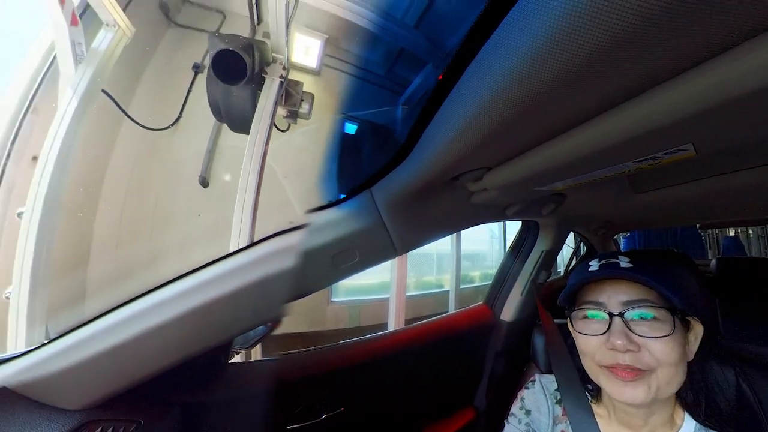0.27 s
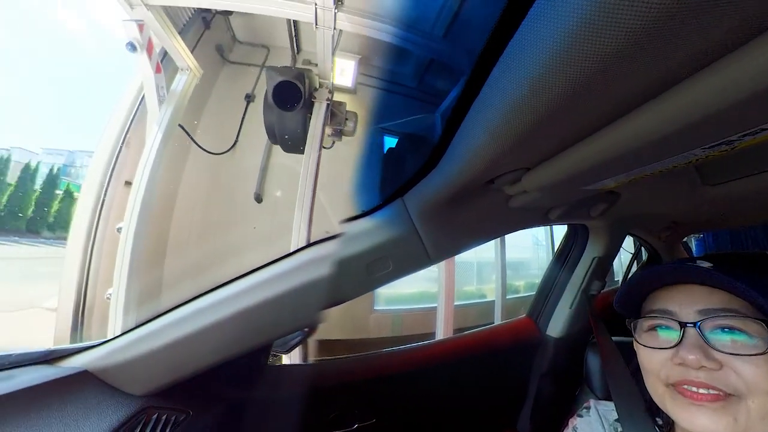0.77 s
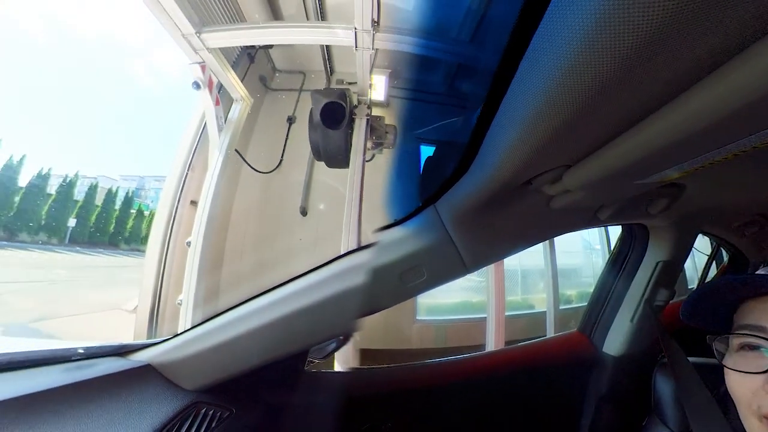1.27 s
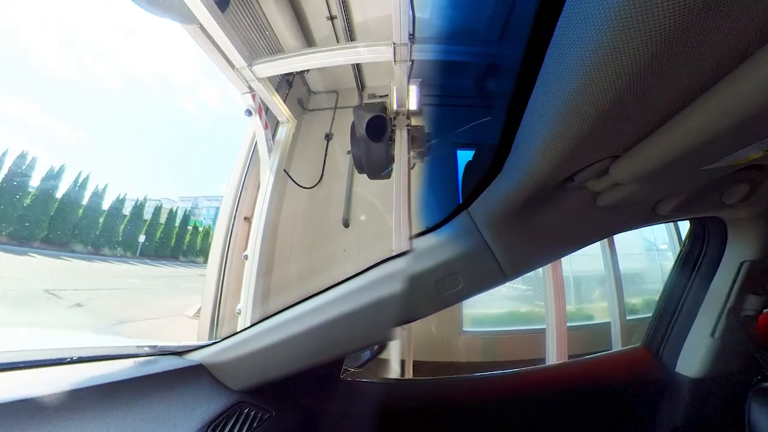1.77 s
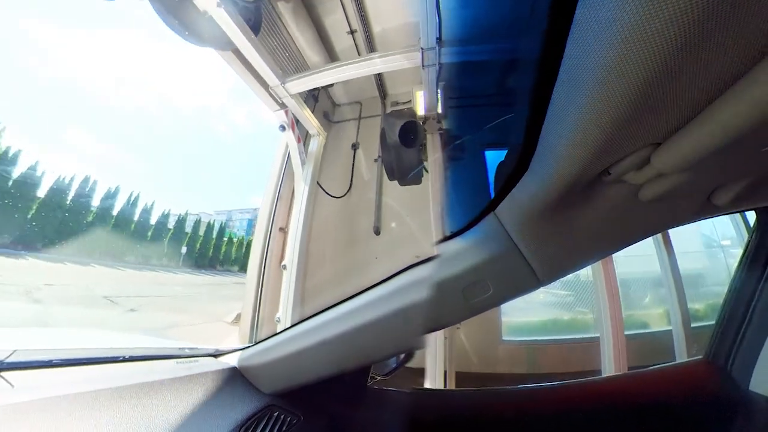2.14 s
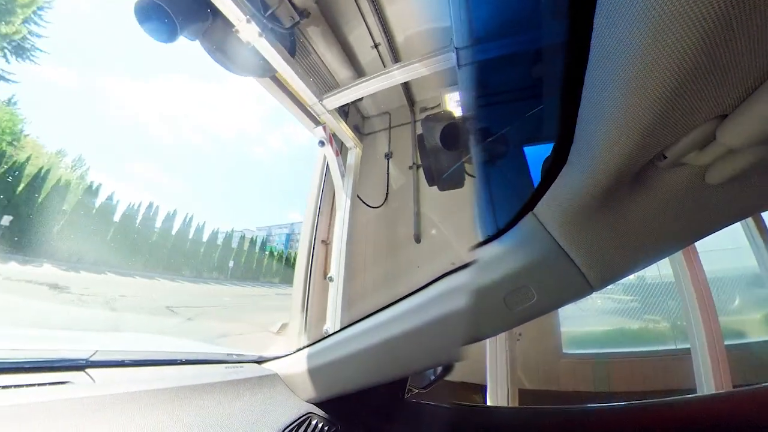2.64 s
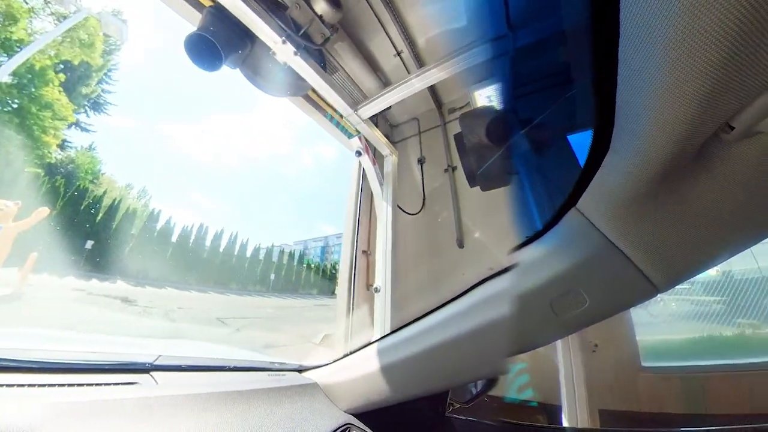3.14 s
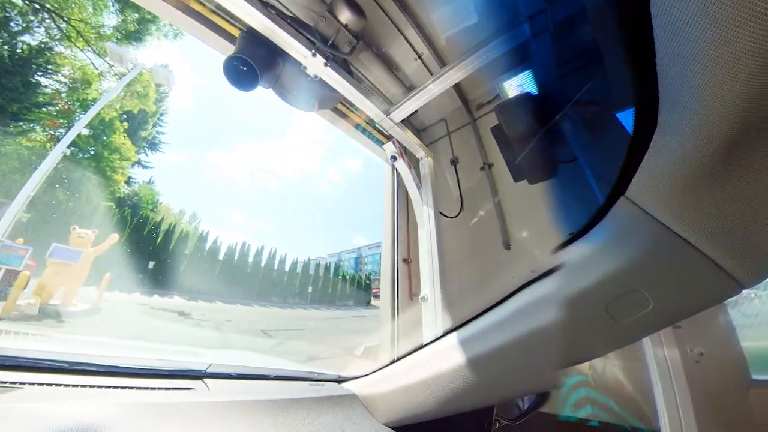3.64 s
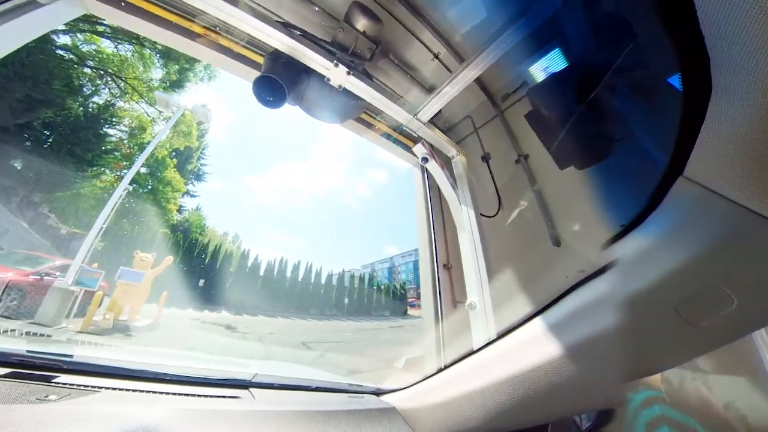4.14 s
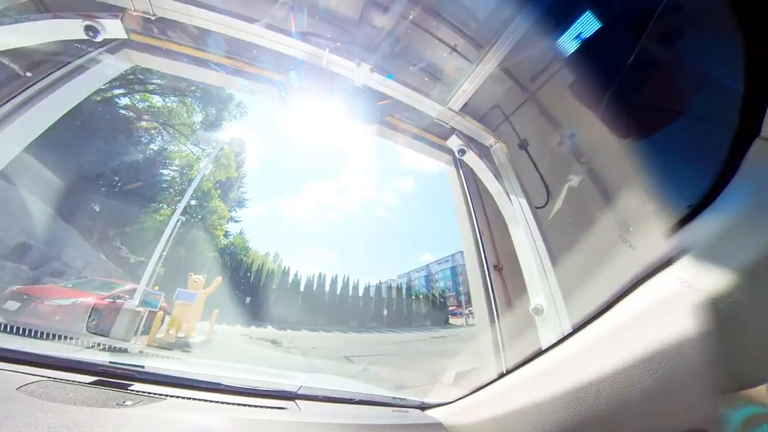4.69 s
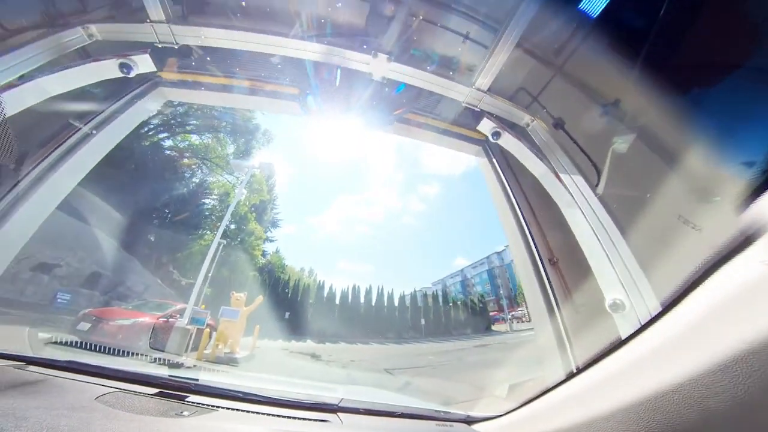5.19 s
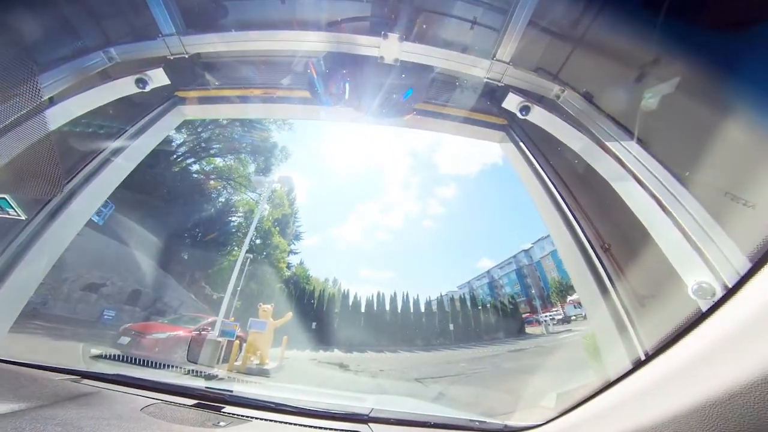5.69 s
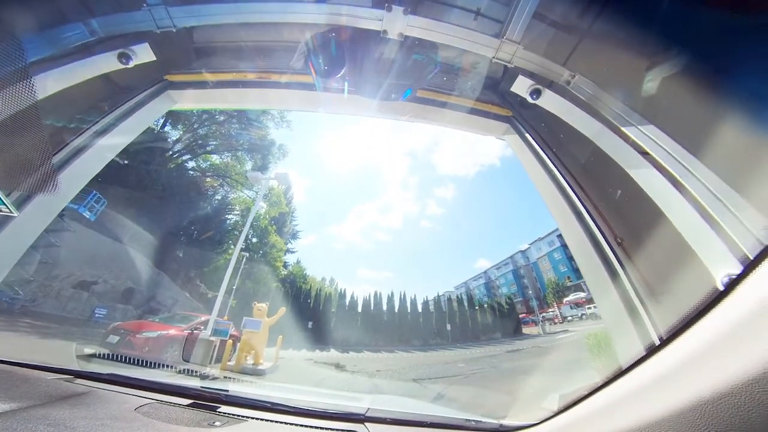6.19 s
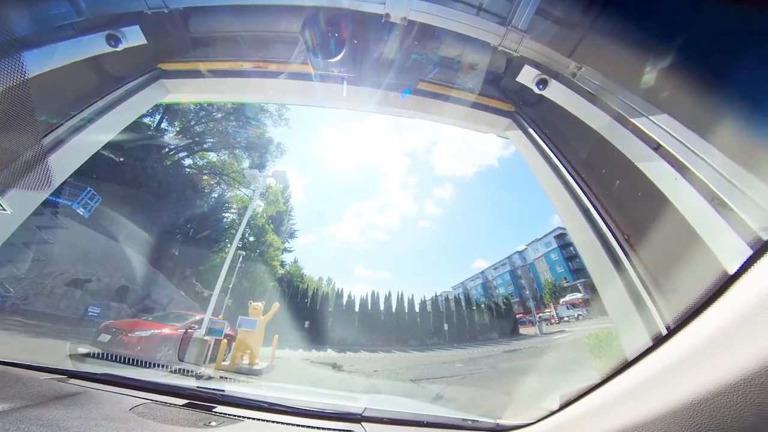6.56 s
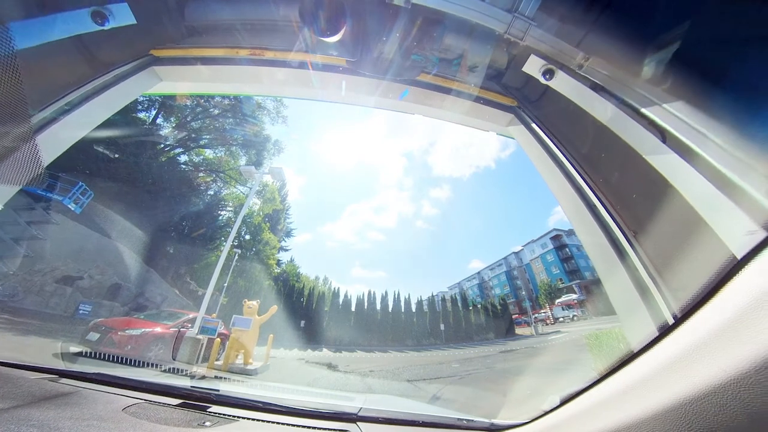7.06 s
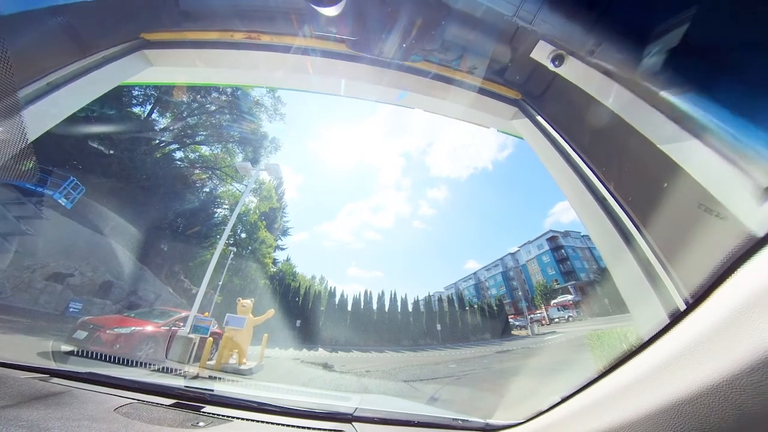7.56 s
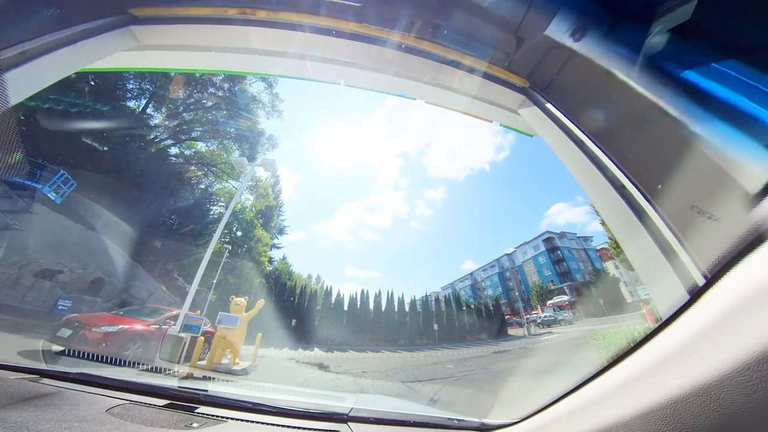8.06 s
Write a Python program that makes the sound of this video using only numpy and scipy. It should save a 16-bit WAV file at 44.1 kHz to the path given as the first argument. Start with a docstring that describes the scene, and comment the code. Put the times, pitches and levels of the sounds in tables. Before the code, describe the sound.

Car wash dryers roar and rumble, heard muffled from inside a closed car, with a faint hiss of spray on the glass.

```python
"""A muffled roar over a low drone, heard from inside a closed car rolling under a car wash's dryers.
The air jets, just outside, come through glass and body to one microphone in the cabin, and shake its
low resonances in turn as they sweep from the windscreen over the roof. The blowers drone first, then
the roof booms. Ducts and fans moan faintly in the roar; close by, air and spray fizz on the windows."""
import sys
import numpy as np
from scipy import signal
from scipy.fft import rfft, irfft, next_fast_len
from scipy.io import wavfile
from scipy.ndimage import uniform_filter1d

SR = 44100
rng = np.random.default_rng(int(sys.argv[2]) if len(sys.argv) > 2 else 0)


def unload_audio(sound):
    """Save the sound as a 16-bit wav file, at the path given as the first command line argument."""
    columns = np.transpose(np.atleast_2d(sound))
    # keep every value between -1 and 1, then stretch to whole-number steps
    steps = np.round(np.clip(columns, -1, 1) * 32767)
    wavfile.write(sys.argv[1], SR, steps.astype(np.int16))


N = 367353
TIME = np.arange(N) / SR

# Air and spray on the glass, heard from inside. Each row: frequency in Hz, relative level in dB.
SPRAY_SPECTRUM = [(1500, -12), (2800, -3), (3200, -0.2), (3650, -1.2), (4300, -4), (4900, -4), (5400, -2.5),
                  (6000, -5), (6750, -8), (7500, -15.5), (8200, -23.5), (9000, -31)]
# Nozzles passing close over the glass. Each row: nearest moment and half length in seconds,
# rise of the spray in dB, then the seal hiss's level in dB, pitch in Hz and width in Hz.
NOZZLE_PASSES = [(0.2, 0.8, 3.5, -67, 5150, 420), (4.2, 0.8, 1.1, -73, 5440, 520)]


def gain_of(db):
    """Decibels to gain."""
    return 10 ** (np.asarray(db) / 20)


def unit_rms(x):
    """Scales to an rms of one."""
    return x / np.sqrt(np.mean(x ** 2) + 1e-20)


def spectrum_db(points, hz):
    """Level at hz of a spectrum whose points are joined on a log-frequency axis."""
    point_hz, db = np.transpose(points)
    return np.interp(np.log(hz + 1), np.log(point_hz + 1), db)


def noise(colour):
    """Noise of rms one, its spectrum shaped by the gain colour(hz)."""
    size = next_fast_len(N)
    spectrum = rfft(rng.standard_normal(size)) * colour(np.fft.rfftfreq(size, 1 / SR))
    return unit_rms(irfft(spectrum, size)[:N])


def ringing(hz, width_hz, steadiness=0):
    """A resonance driven by turbulence: its size and phase wander as fast as its width allows."""
    slow_time = TIME[::8]
    offset_hz = np.fft.fftfreq(next_fast_len(len(slow_time)), slow_time[1])
    real, imag = rng.standard_normal((2, len(offset_hz)))
    swing = np.fft.ifft((real + 1j * imag) / (1 + 2 * (offset_hz / width_hz) ** 2))[:len(slow_time)]
    swing = swing / swing.real.std()
    swing = swing / (1 + abs(swing) ** 2) ** steadiness  # large swings are damped most
    size = np.interp(TIME, slow_time, abs(swing))
    wander = np.interp(TIME, slow_time, np.unwrap(np.angle(swing)))
    phase = 2 * np.pi * np.cumsum(hz * np.ones(N)) / SR
    return unit_rms(size * np.cos(phase + wander))


def passing(at_s, half_s):
    """Nearness, 0 to 1, of something the car rolls past at a steady pace."""
    return np.exp(-((TIME - at_s) / half_s) ** 2)


def crossed(at_s, lasting_s):
    """A smooth step from 0 to 1 as the jets cross from one part of the car to the next."""
    return .5 + .5 * np.tanh(2 * (TIME - at_s) / lasting_s)


def lull(at_s=2.12, drop_s=0.46, recover_s=3):
    """Shielding by the body, 0 to 1: it sets in as the first jets leave the windscreen, then ebbs."""
    return crossed(at_s, drop_s) * passing(at_s, recover_s)


def deep_gain(dip_db=4):
    """Gain of the deepest rumble, which thins while the jets are square over the roof."""
    return gain_of(-dip_db * passing(at_s=4.8, half_s=0.32))


def roar(low_db=-23.0, upper_db=-25.5, low_lull_db=1.35, upper_lull_db=1.0, leaving_db_per_s=0.0944):
    """The jets' turbulence, muffled by the body; it eases in the lull and dulls as the car leaves."""
    # The roar as it reaches the cabin. Each row: frequency in Hz, relative level in dB.
    through_body = [(20, -34), (38, -6), (70, 4), (160, 2), (270, -0.84), (325, -1.3), (400, -4), (485, -6),
                    (530, -7), (750, -12), (1020, -20), (1450, -24), (2150, -35), (2900, -41.5),
                    (4000, -57.5), (8000, -70.5)]
    # Resonances of windows and trim. Each row: centre in Hz, width in Hz, lift in dB.
    panels = [(1100, 120, 2), (1460, 70, 0), (2460, 290, 2)]

    def colour(hz):
        panels_db = sum(db / (1 + (2 * (hz - centre) / width) ** 2) for centre, width, db in panels)
        return gain_of(spectrum_db(through_body, hz) + panels_db)

    def below(edge_hz):
        return irfft(rfft(rush) / (1 + (np.fft.rfftfreq(N, 1 / SR) / edge_hz) ** 10), N)
    rush = noise(colour)
    low, deep = below(edge_hz=540), below(edge_hz=88)
    low_gain = gain_of(low_db - low_lull_db * lull())
    upper_gain = gain_of(upper_db - upper_lull_db * lull() - leaving_db_per_s * TIME)
    return low_gain * (low - deep + deep_gain() * deep) + upper_gain * (rush - low)


def cabin_rumble():
    """Low resonances around the microphone swell in turn as the jets cross the body's yielding spots."""
    # Each row: pitch, its climb as the jets reach the roof and width in Hz, mean level and swing in dB,
    # strongest moment and time from one yielding spot to the next in seconds.
    cabin_modes = [(108.94, 17, 38, -27.5, 2.5, 2.23, 7.6), (168.2, 18, 42, -29.5, 3, 4.65, 7.9)]
    on_roof = crossed(at_s=3.7, lasting_s=2.001)
    out = np.zeros(N)
    for hz, climb_hz, width_hz, level_db, swing_db, strongest_s, period_s in cabin_modes:
        drive = np.cos(2 * np.pi * (TIME - strongest_s) / period_s)
        mode = ringing(hz + climb_hz * on_roof, width_hz, steadiness=0.27)
        out += gain_of(level_db + swing_db * drive) * mode
    return out


def blower_drone():
    """The blowers' firm low drone sags and swells as the car nears them, then fades behind the roof."""
    # Each row: time in seconds, pitch in Hz, level in dB.
    drone_course = [(0, 117, -28), (0.8, 112, -31), (1.7, 109, -28), (2.3, 106, -24.5), (3.0, 104, -25.3),
                    (3.5, 110, -31.5), (4.5, 110, -70.5)]
    times, hz, db = np.transpose(drone_course)
    drone = ringing(np.interp(TIME, times, hz), width_hz=12, steadiness=0.5)
    return gain_of(np.interp(TIME, times, db)) * drone


def buffeting(gust_width_hz=19, steadiness=0.33):
    """The body drums all the while, and each gust makes one panel swell and die away."""
    # The whole body's drumming: pitch in Hz, width in Hz, level in dB.
    body_mode = (45.1, 13, -34)
    # Gusts on the panels. Each row: peak and half length in seconds, pitch in Hz, level in dB.
    gusts = [(0.106, 0.46, 134.3, -29.5), (1.303, 0.8, 43.98, -28), (1.849, 0.3, 372.2, -36.5),
             (1.9, 0.35, 152, -29), (4.4, 0.7, 125.8, -30.5), (5.45, 0.4, 432, -36.5),
             (6.2, 0.7, 228.9, -31.5), (6.151, 0.76, 45.7, -29.5), (7.1, 0.4, 76, -29.5),
             (7.554, 0.6, 45.9, -25), (8.101, 0.26, 431, -37), (8.149, 0.51, 135.3, -27)]
    body_hz, body_width_hz, body_db = body_mode
    out = gain_of(body_db) * deep_gain() * ringing(body_hz, body_width_hz, steadiness)
    for at_s, half_s, hz, db in gusts:
        out += gain_of(db) * passing(at_s, half_s) * ringing(hz, gust_width_hz, steadiness)
    return out


def duct_moan(lull_db=5):
    """The air ducts' hollow notes sink in the lull and grow as the jets cross the roof."""
    # Each row: pitch in Hz, width in Hz, level in dB, rise over the roof in dB.
    duct_notes = [(436.4, 18, -47, 4.5), (479, 11, -45, 6)]
    near = passing(at_s=6.0, half_s=1.3)
    moan = sum(gain_of(db + rise_db * near) * ringing(hz, width_hz, steadiness=0.5)
               for hz, width_hz, db, rise_db in duct_notes)
    return gain_of(-lull_db * lull()) * moan


def fan_notes(level_db=-49, lull_db=6, leaving_db_per_s=0.28):
    """The fans' blurred notes sink in the lull and fade with distance as the car leaves."""
    # Each row: pitch in Hz, width in Hz, relative level in dB.
    notes = [(593.5, 10, -3), (709, 4.5, 0), (751, 26, -3), (836, 16, -1.5), (953.5, 37, -2.5)]
    singing = sum(gain_of(db) * ringing(hz, width_hz, steadiness=0.5) for hz, width_hz, db in notes)
    return gain_of(level_db - lull_db * lull() - leaving_db_per_s * TIME) * singing


def spray_db(base_db=-66, drying_db_per_s=0.09):
    """Level of air and water on the glass: it rises under each nozzle and falls as the car dries."""
    rises_db = sum(db * passing(at_s, half_s) for at_s, half_s, db, *_ in NOZZLE_PASSES)
    return base_db - drying_db_per_s * TIME + rises_db


def window_fizz(over_spray_db=4.0, patchy_db=2.1, patch_hz=4300, spread_hz=1500, flicker_db=1.03):
    """Air and spray hiss on the glass near the microphone, flickering, patchy in mid-range."""
    hz, _, hiss = signal.stft(rng.standard_normal(N), SR, nperseg=512, noverlap=384)
    patches = rng.standard_normal(hiss.shape)
    for size, axis in (7, 0), (3, 0), (14, 1), (5, 1):  # blur across frequency, then time
        patches = uniform_filter1d(patches, size, axis)
    patches = unit_rms(patches)
    drift = uniform_filter1d(patches, size=110, axis=1)
    patches = unit_rms(np.tanh(patches - drift))
    flicker = unit_rms(uniform_filter1d(rng.standard_normal(hiss.shape[1]), size=8))
    depth_db = patchy_db / (1 + ((hz - patch_hz) / spread_hz) ** 10)
    shape_db = spectrum_db(SPRAY_SPECTRUM, hz)[:, None] + depth_db[:, None] * patches
    _, fizz = signal.istft(hiss * gain_of(shape_db + flicker_db * flicker), nperseg=512, noverlap=384)
    return gain_of(spray_db() + over_spray_db) * unit_rms(fizz[:N])


def seal_hiss(steady_db=-78.0, lull_db=4):
    """A narrow hiss, as of air forced along a window seal: faint throughout, stronger under a nozzle."""
    blasts = sum(gain_of(db) * passing(at_s, half_s) * ringing(hz, width_hz)
                 for at_s, half_s, _, db, hz, width_hz in NOZZLE_PASSES)
    return gain_of(steady_db - lull_db * lull()) * ringing(hz=5440, width_hz=340) + blasts


def jet_whistle(steady_db=-79):
    """A faint, airy whistle of the jets that flares up now and then."""
    # Each row: peak in seconds, half length in seconds, level in dB.
    flares = [(1.2, 0.3, -77), (1.9, 0.2, -73), (5.5, 0.3, -77.5), (6.8, 0.15, -75)]
    flaring = sum(gain_of(db) * passing(at_s, half_s) for at_s, half_s, db in flares)
    return (gain_of(steady_db) + flaring) * ringing(hz=3590, width_hz=170)


def droplets(under_spray_db=9, per_s=160, spread_db=3):
    """Fine drops blown against the glass tick faintly inside the hiss."""
    sizes = gain_of(spread_db * np.minimum(rng.exponential(1, N), 4)) * rng.choice([-1, 1], N)
    hits = sizes * (rng.random(N) < per_s / SR)
    colour = gain_of(spectrum_db(SPRAY_SPECTRUM, np.fft.rfftfreq(N, 1 / SR)))
    ticks = irfft(rfft(hits) * colour, N)
    return gain_of(spray_db() - under_spray_db) * unit_rms(ticks)


def faint_ticks(tick_hz=7300, width_hz=1400, decay_s=0.0016, tail_db=-13, tail_s=0.03):
    """A few faint, high ticks in quick succession, each with a brief hissy tail."""
    # Each row: start in seconds, level in dB.
    ticks = [(1.990, -72), (1.9945, -65), (2.046, -69), (2.085, -70), (2.101, -68)]
    envelope = np.zeros(N)
    for start_s, db in ticks:
        age = np.maximum(TIME - start_s, 0)
        decay = np.exp(-age / decay_s) + gain_of(tail_db) * np.exp(-age / tail_s)
        envelope += gain_of(db) * (TIME >= start_s) * decay
    return envelope * noise(lambda hz: np.exp(-((hz - tick_hz) / width_hz) ** 2))


def roof_boom(level_db=-27.2, boom_hz=200, climb_hz_per_s=3, strongest_s=4.85):
    """Overhead, the roof booms on one note under the jets; the note creeps up as they move back."""
    pitch_hz = boom_hz + climb_hz_per_s * (TIME - strongest_s)
    boom = ringing(pitch_hz, width_hz=13, steadiness=0.45)
    return gain_of(level_db) * passing(strongest_s, half_s=1.9) * boom


def scene():
    """Everything meets at one microphone in the cabin."""
    body = roar() + cabin_rumble() + blower_drone() + roof_boom() + buffeting()
    machinery = duct_moan() + fan_notes()
    treble = window_fizz() + seal_hiss() + jet_whistle() + droplets() + faint_ticks()
    return (body + machinery + treble)[None]


def record(dry, low_cut_hz=33, threshold_db=-20, cut_per_db=0.15, top_hz=8700):
    """The microphone's low cut, gentle gain control on the loudest swells, then the band limit."""
    x = signal.sosfilt(signal.butter(6, low_cut_hz, "highpass", fs=SR, output="sos"), dry)
    power = uniform_filter1d(uniform_filter1d(x ** 2, size=1300), size=700)
    over_db = np.maximum(10 * np.log10(abs(power) + 1e-12) - threshold_db, 0)
    x = x / gain_of(cut_per_db * over_db)
    x = x * signal.windows.tukey(N, .001)  # click-free ends
    band_limit = signal.firwin(255, top_hz, window=("kaiser", 9), fs=SR)
    return signal.oaconvolve(x, band_limit[None], "same")


dry = scene()
out = record(dry)
unload_audio(out)
```